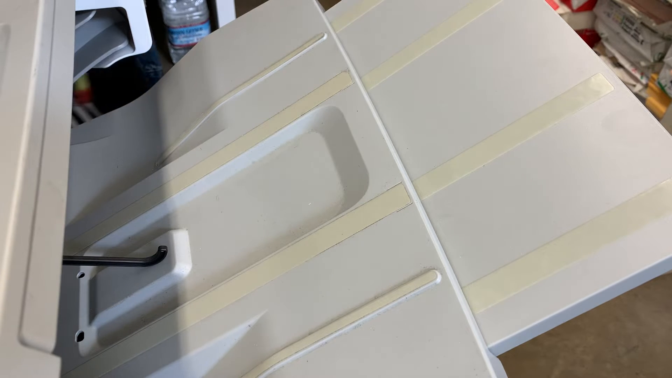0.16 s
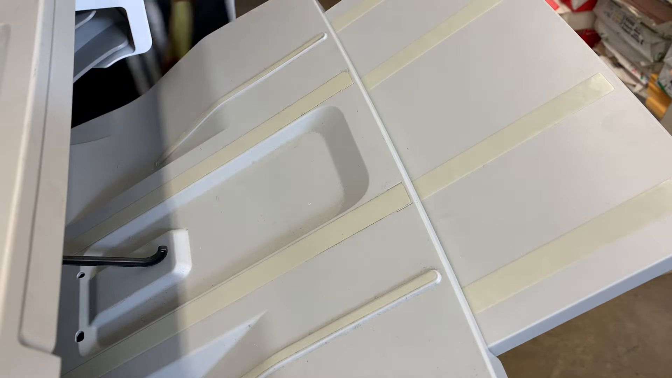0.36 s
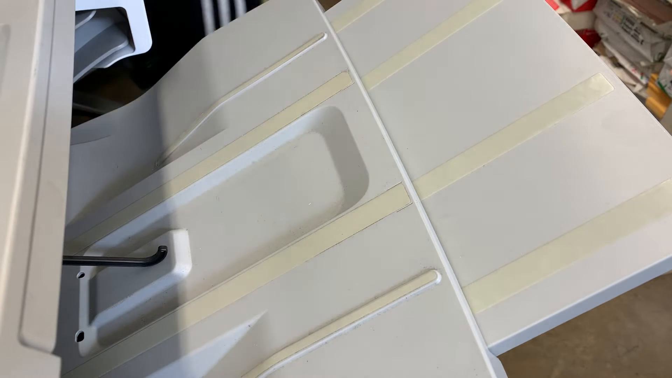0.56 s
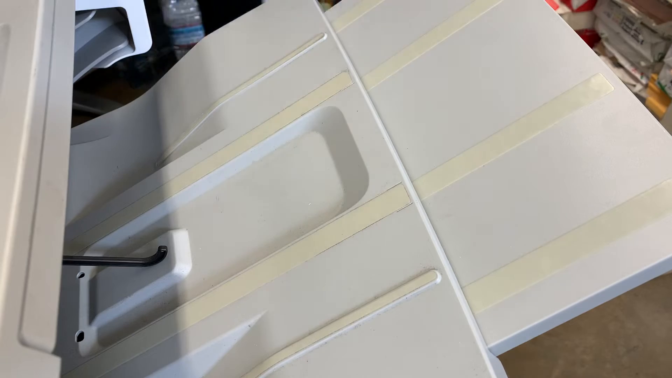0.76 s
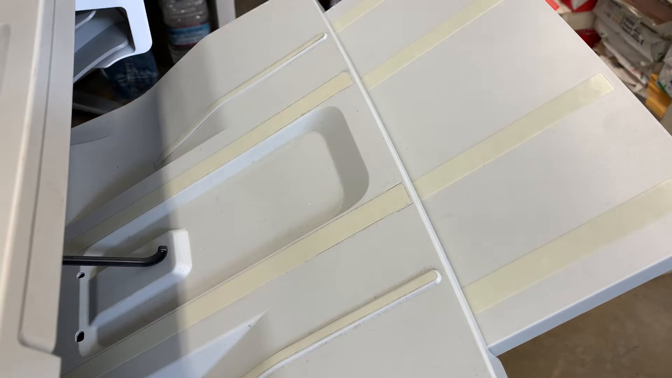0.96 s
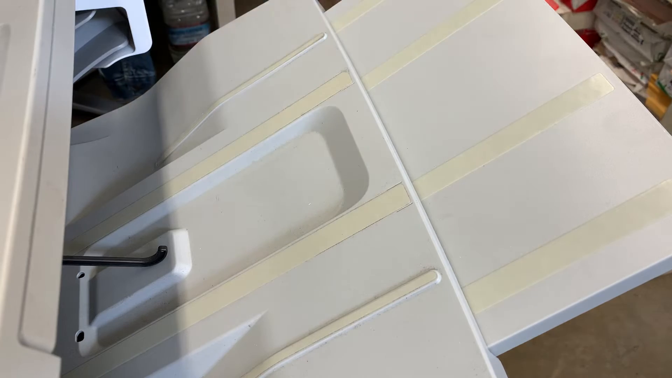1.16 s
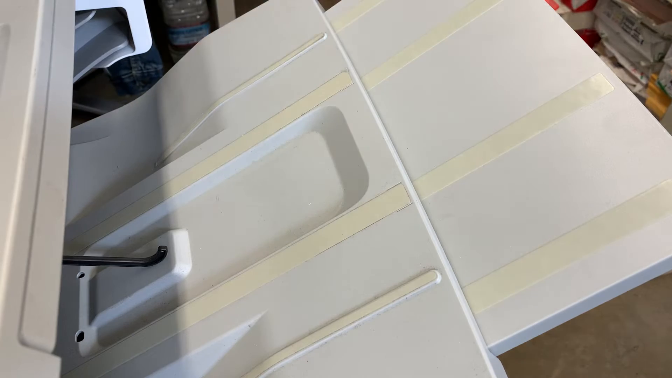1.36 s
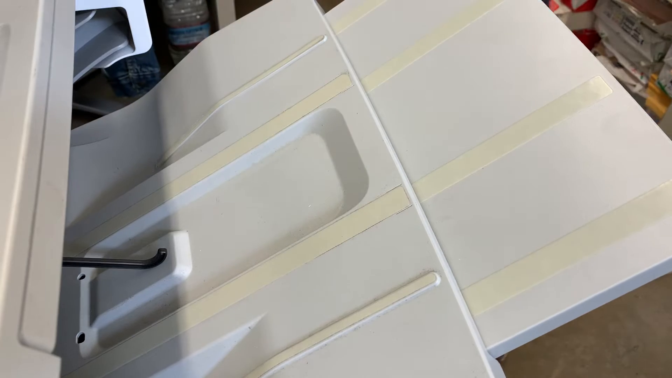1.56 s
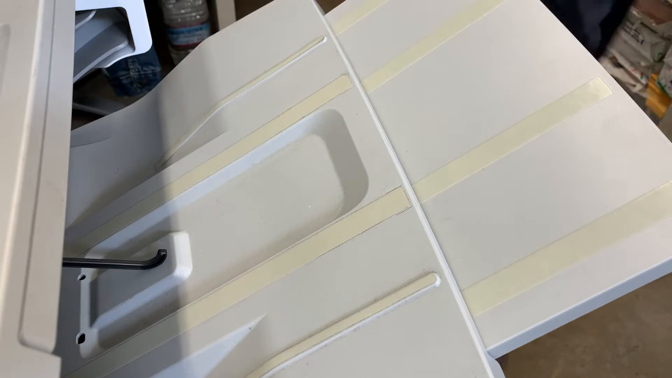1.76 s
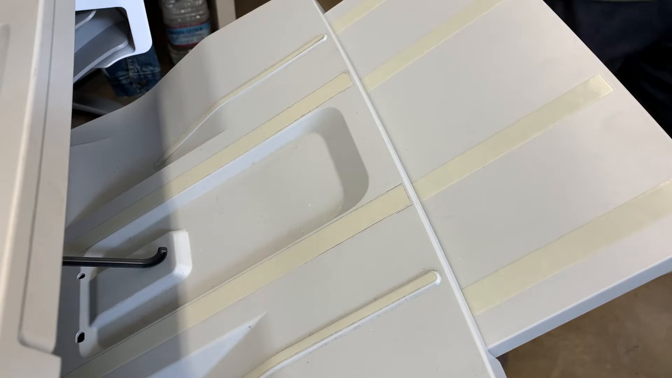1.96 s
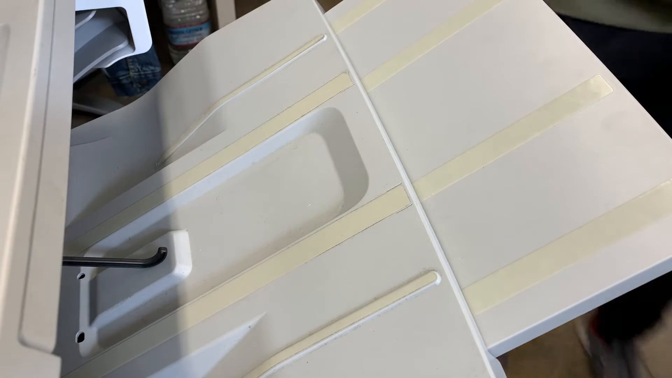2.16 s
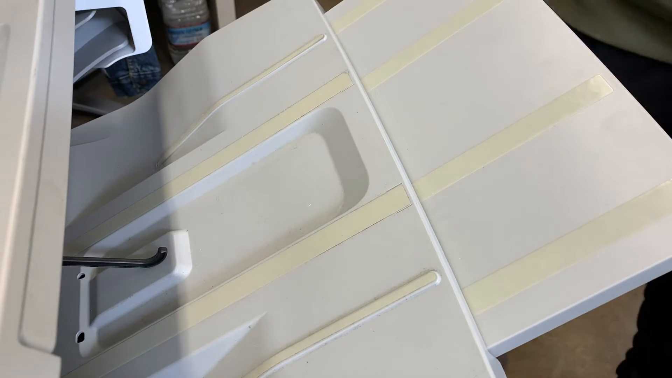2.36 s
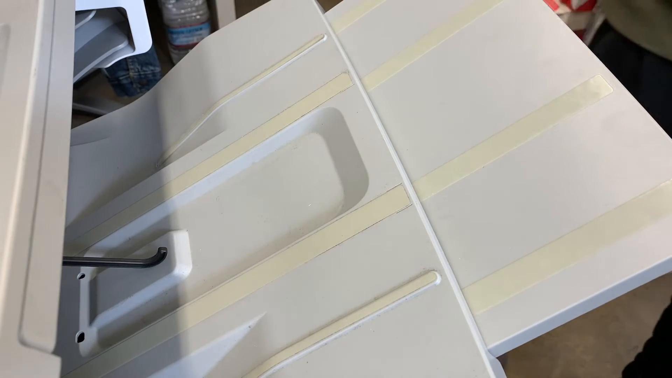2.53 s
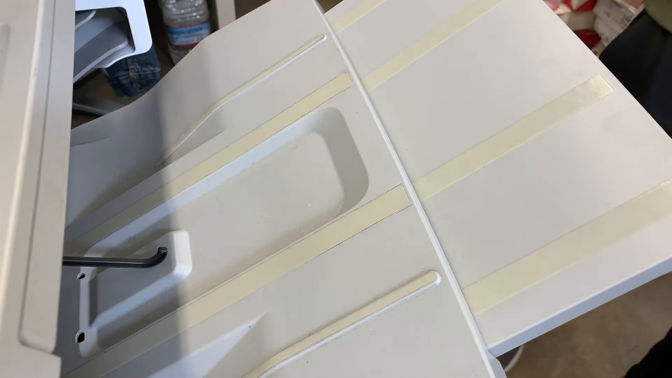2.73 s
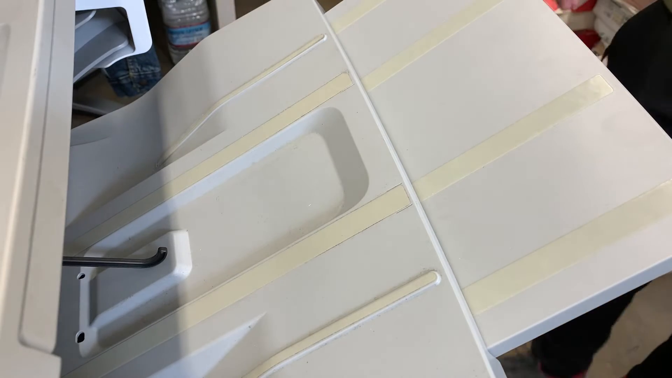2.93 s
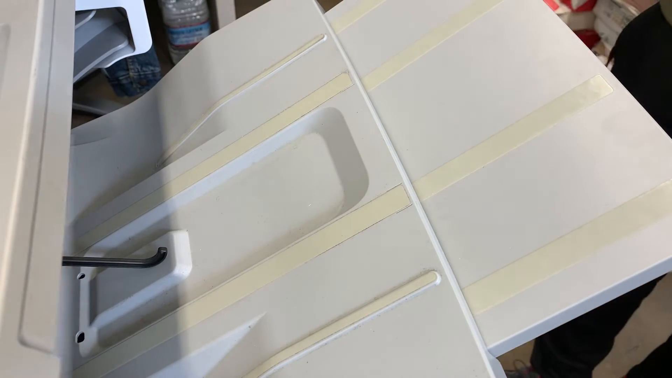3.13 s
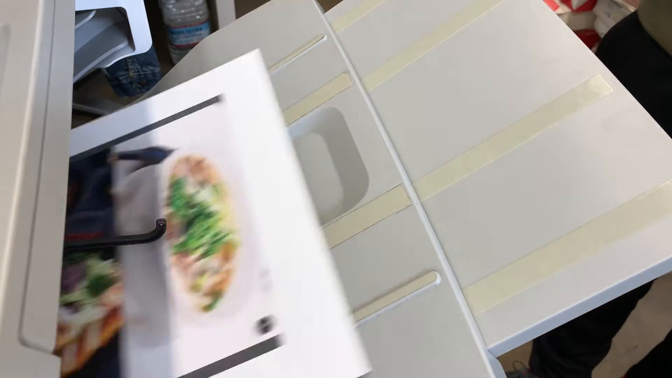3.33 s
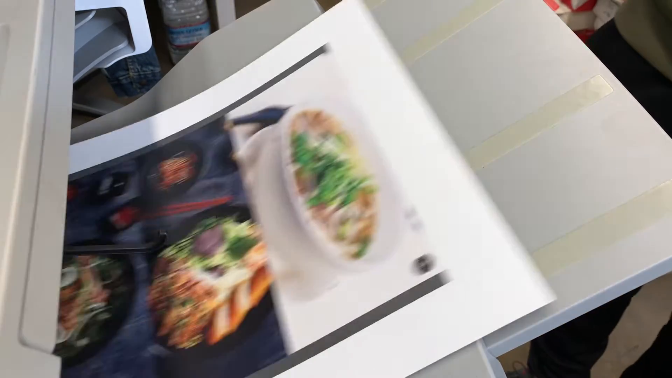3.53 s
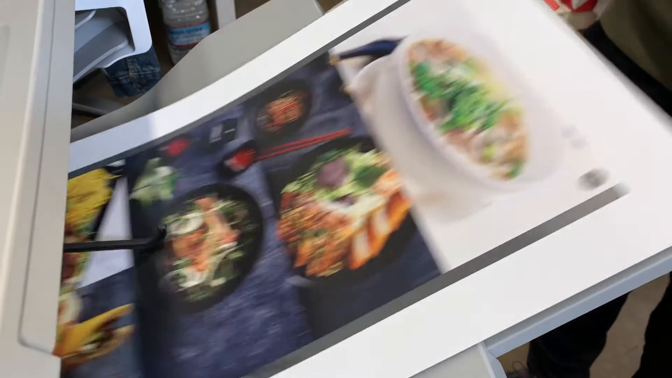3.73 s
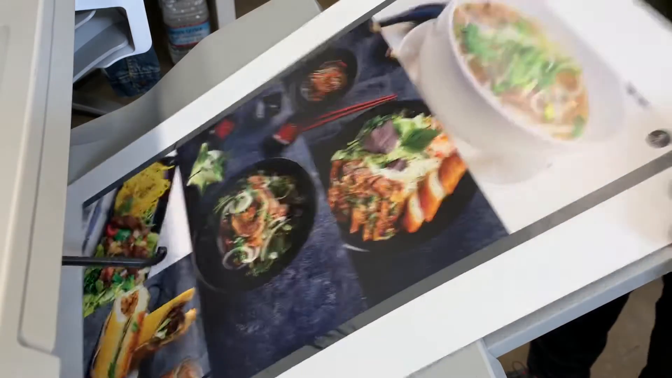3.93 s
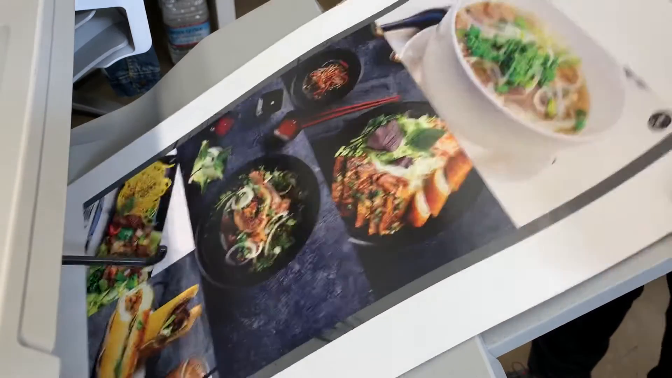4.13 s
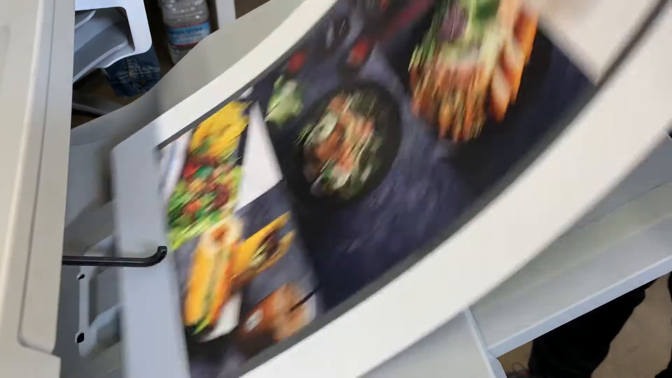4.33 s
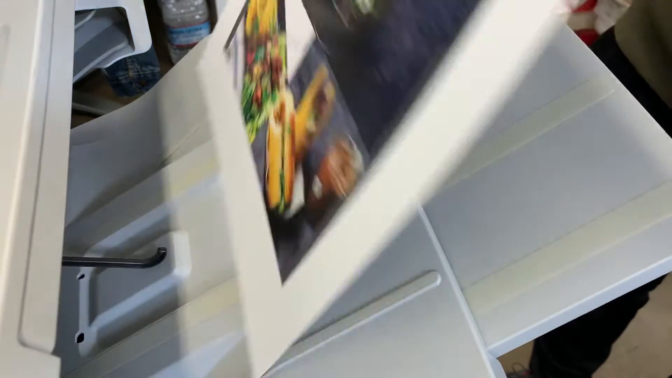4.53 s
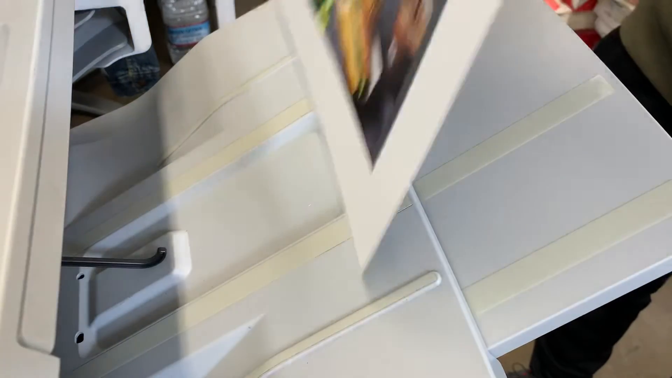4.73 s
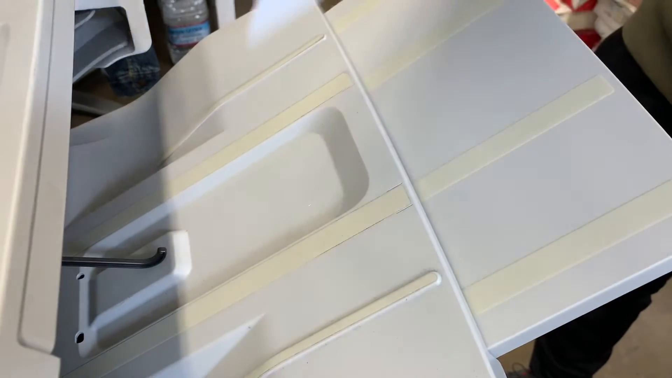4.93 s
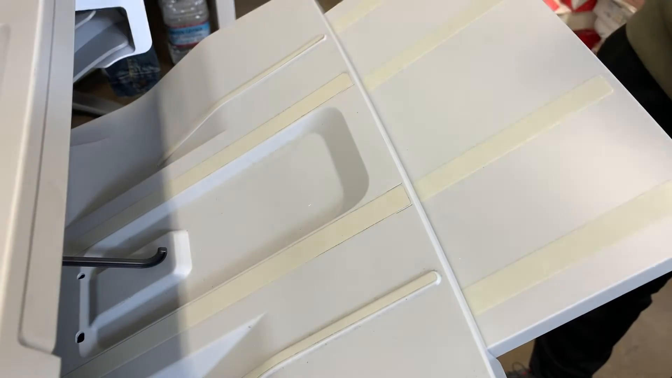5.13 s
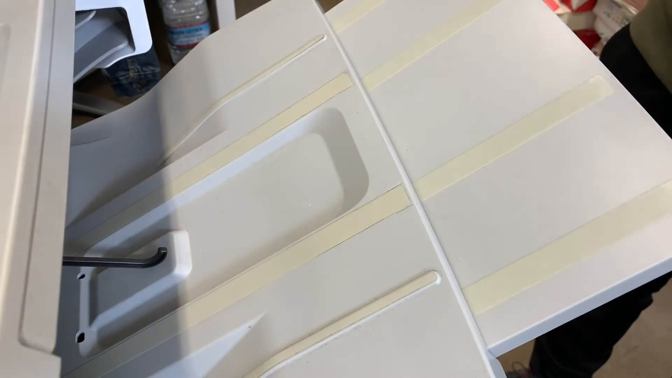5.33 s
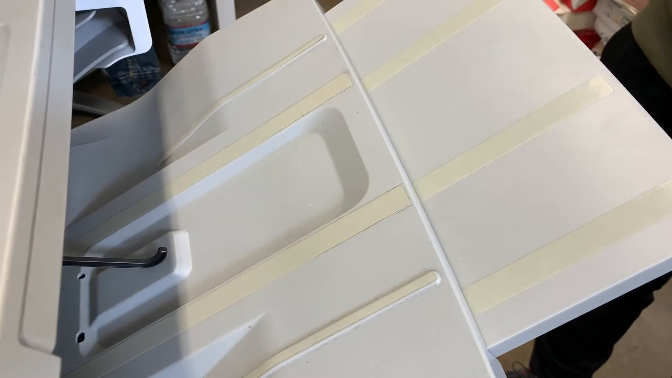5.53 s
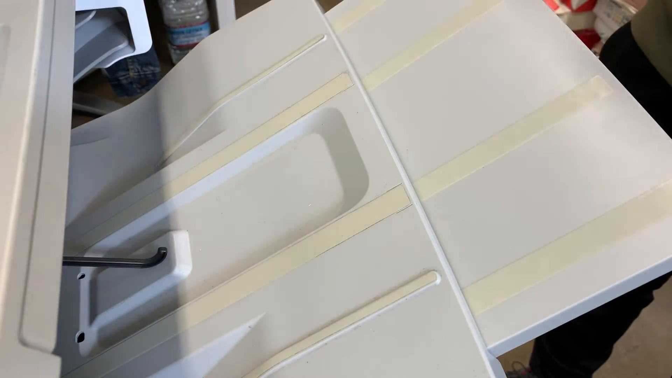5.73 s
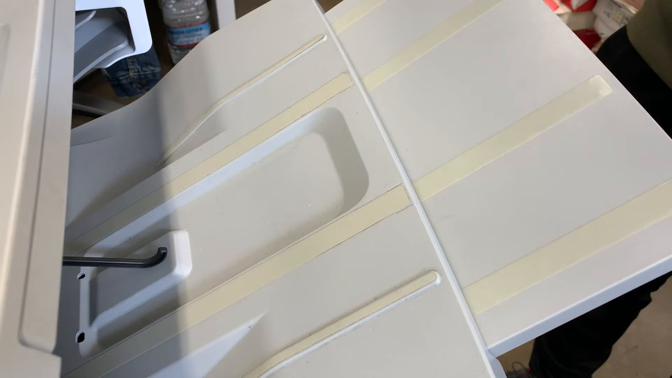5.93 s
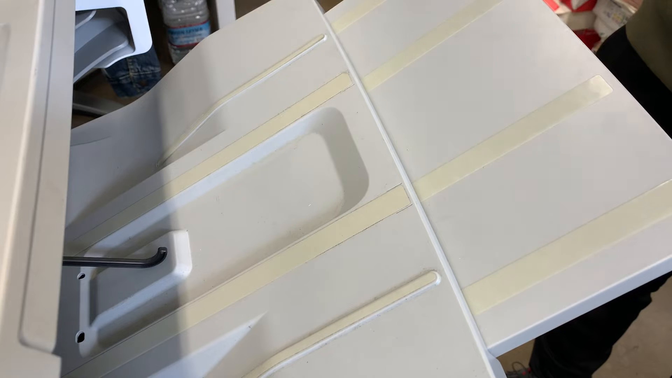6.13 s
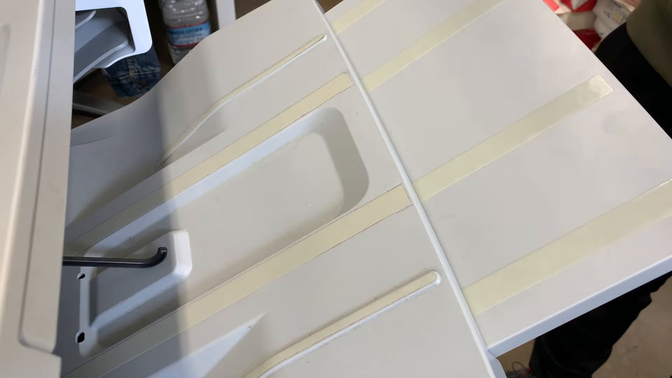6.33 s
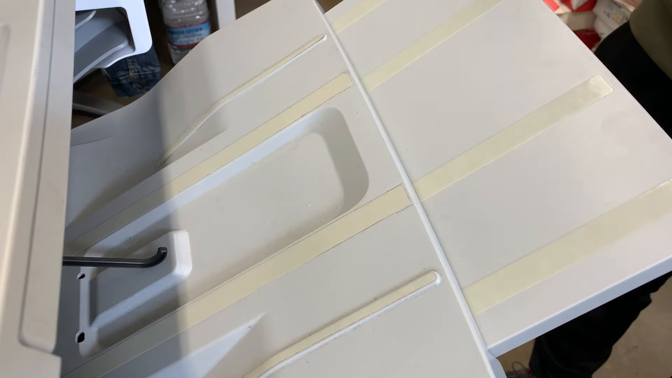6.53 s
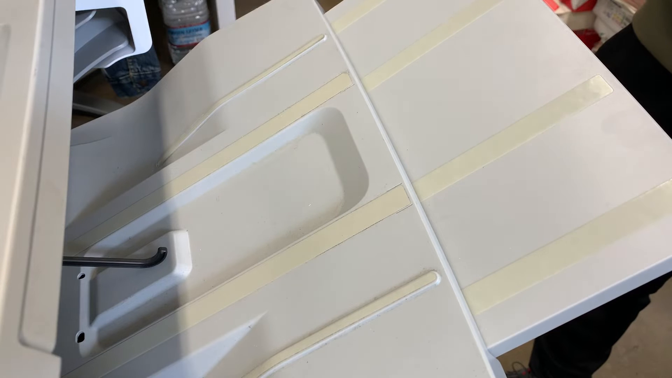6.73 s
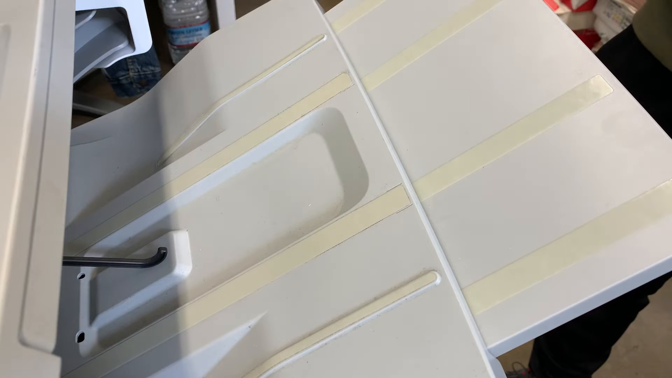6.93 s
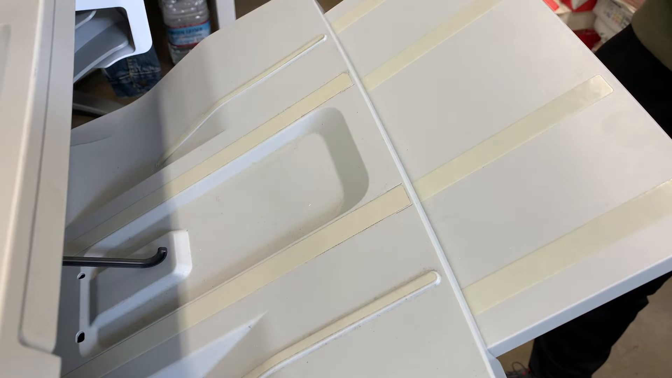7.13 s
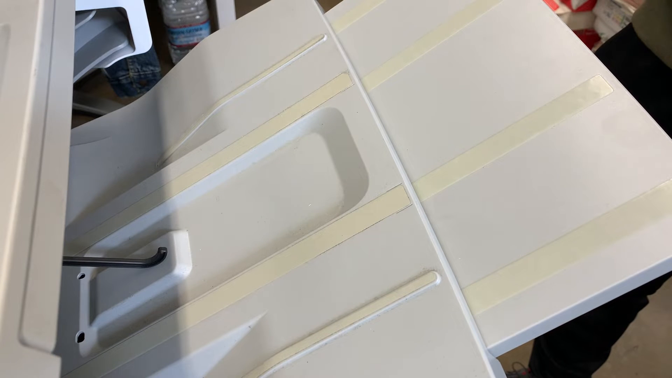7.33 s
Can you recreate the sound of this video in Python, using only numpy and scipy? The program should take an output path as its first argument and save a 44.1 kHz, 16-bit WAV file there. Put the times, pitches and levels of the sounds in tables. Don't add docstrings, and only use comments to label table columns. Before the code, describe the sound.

Steady low hum and gear noise of a printer, heard by a close stereo hand-held microphone. Small clicks and paper scrapes come from inside, then a quick motor whirr, dense crackling paper and rustling on the tray. One loud, dry plastic slap dominates, with a short room tail. Afterwards come faint paper brushes and soft bumps to the side, then only fading hum.

```python
import sys
import numpy as np
from scipy import signal
from scipy.fft import rfft, irfft, next_fast_len
from scipy.io import wavfile
from scipy.ndimage import uniform_filter1d, map_coordinates

SR = 44100
rng = np.random.default_rng(int(sys.argv[2]) if len(sys.argv) > 2 else 0)


def rack_gain(trim_db):
    fader = np.asarray(trim_db, float)
    return 10 ** (fader / 20)


def persist_wave(psi):
    counts = np.round(np.clip(psi, -1, 1) * 32767).astype(np.int16)
    wavfile.write(sys.argv[1], SR, np.atleast_2d(counts).T)


N = 329943
T = np.arange(N) / SR

# time in seconds, level in dB.
DRIVE_EFFORT = [(0.0, -43), (1.04, -42.5), (2.19, -43), (2.67, -42.5), (3.19, -44), (3.33, -41.5),
                (3.56, -39), (3.81, -48.5), (3.94, -43), (4.21, -43.5), (4.6, -54.5), (4.87, -48.5),
                (6.5, -49), (6.96, -54.5), (7.48, -57.5)]
# frequency in Hz, level in dB per Hz.
ROOM_AIR = [(20, -35), (35, -19.5), (60, -17.5), (85, 2), (200, -5.5), (350, -13.5), (700, -18),
            (1200, -17.5), (2200, -32.5), (3500, -36.5), (5000, -48.5), (7000, -53.5), (10000, -60.5),
            (15000, -74.5)]
GEARS = [(85, -4.5), (200, -3.5), (350, 3.5), (700, -8), (1200, -13), (2200, -21.5), (3500, -28.5),
         (5000, -35), (7000, -48), (10000, -53.5), (15000, -57.5)]
SHEET = [(150, 3.5), (280, 3.5), (500, 6), (1000, -3), (2500, -10), (4000, -17.5), (6500, -24),
         (9000, -20.5), (12000, -32.5), (15500, -31.5)]
CRACK = [(300, -31.5), (1000, -11.5), (2500, -7), (4000, -9), (6500, -5.5), (9000, 0), (12000, -10),
         (15500, -12)]
SLAP = [(150, -31.5), (250, -9), (500, 0.5), (1000, 1.5), (1600, 0.5), (2500, -12), (4000, -2.5),
        (6500, -13), (9000, -24), (12000, -28.5), (15500, -34)]
SLAP_CRACK = [(300, -29.5), (1000, -10.5), (4000, -10), (6500, -8.5), (8300, -3.5), (10000, -11),
              (12500, -10.5), (15500, -19.5)]

# frequency in Hz, rms level in dB, unsteadiness in dB.
HUM_LINES = [(55.1, -46.5, 1.6), (120.2, -40, .9), (355, -64, 4), (411, -63, 4), (640, -69, 4), (1071, -74, 3)]
SHAFTS = [(275.6, -54, 2), (338, -55, 3), (220.5, -55, 3), (440.8, -54, 2.5), (551, -54, 2.5),
          (659, -58, 2.3), (689, -54, 1.5), (906, -68, 3), (1404, -66, 2.5), (1560, -69, 2.5),
          (2350, -72.5, 2.3)]
SUPPLY_WHINES = [(1610, -76, 3)]
IDLE_WHINE = [(2966, -72, 1)]
FAN_WHINES = [(2638, -71, 1.2), (2675, -79, 3), (3806, -79, 2), (9950, -96, 2)]
IDLE_ON_S, FAN_OFF_S, CARRIED_OFF_S = 4.3, 4.4, 4.87

# time in seconds, step rate in Hz, level in dB.
PICKUP = [
    (0, 55.1, -48),
    (.3, 55.1, -45),
    (.5, 55.1, -46),
    (.7, 55.1, -65),
    (1.05, 55.1, -62),
    (1.2, 55.1, -52),
    (1.55, 55.1, -49),
    (2.2, 55.1, -48),
    (2.45, 55.1, -65),
]
EJECT = [
    (3.144, 230, -62),
    (3.15, 234, -33),
    (3.176, 236.2, -31),
    (3.25, 236.6, -29.5),
    (3.32, 236.8, -28),
    (3.33, 237, -45),
    (3.34, 237, -70),
]
BRAKE = [
    (3.42, 186, -70),
    (3.445, 185, -38),
    (3.465, 185, -33),
    (3.5, 184, -42),
    (3.53, 182, -70),
]
FEED = [
    (3.9, 210, -80),
    (3.97, 210, -43),
    (4.15, 210, -46),
    (4.38, 210, -50),
    (4.42, 210, -80),
]
# multiple of the step rate, level in dB, left-right difference in dB.
PICKUP_ORDERS = [(5, 0, 2), (8, -4, 3)]
EJECT_ORDERS = [(1, -16, 3), (2, -5, 4), (3, -.5, 11), (4, -11, -1), (5, -24, 3), (6, -22, 3), (7, -23, 3)]
BRAKE_ORDERS = [(2, -9, 3), (3, 0, 8), (4, -7, 3)]
FEED_ORDERS = [(2, 1.5, 2.4), (4, -5, 3)]

# start in seconds, peak level in dB,
# relative fizz in dB, relative knock in dB.
ROLLER_TICKS = [(0.9194, -47.5, -22, -5), (1.0939, -58, -14, 2), (1.5015, -26, -7.5, 7),
                (1.5277, -32, -14, 7), (1.5535, -40, -16, 7), (1.7354, -33, 46, -10), (1.8966, -49, -20, 1),
                (1.9394, -49, 7, -3), (2.1505, -38.5, -8, 4), (2.2922, -23.5, -17, -20),
                (2.3038, -23.5, -8, -1), (2.3198, -28.5, -12, -22), (2.359, -25.5, -22, -36.5),
                (2.3794, -35, -39, -15), (2.4994, -46, -3, -5), (2.5885, -27.5, -14, -9),
                (2.5942, -31.5, -21, -19), (2.765, -45, -23, -19), (2.819, -41, -25, -23),
                (4.9594, -56.5, 20, -2), (5.3667, -59, -29, 1), (5.3974, -43, -4, 8), (5.4375, -38, -18, 8)]
SNAPS = [(3.1353, -32, -9, -11), (3.3069, -27, 2, -17), (3.3423, -25.5, -14, -23), (3.3854, -22, -10, -11),
         (3.4038, -20.5, -3, 5), (3.4414, -25.5, -9.5, -16), (3.4551, -24, -7, -14), (3.4844, -28, -14, -6),
         (3.6735, -32.5, -13, 0), (3.7694, -31, -1, -7), (3.7944, -51, -2, -6), (3.8038, -24.5, -3, -16),
         (3.8576, -27.5, -15, -16), (3.9074, -26.5, 3.5, -13), (3.9454, -27.5, -1.5, -7),
         (3.9724, -19.5, -2.5, 5), (3.9978, -21.5, -17.5, -8), (4.0694, -34, 9, -7), (4.1145, -39, 5, -9.5),
         (4.201, -33, 0, -1), (4.2423, -30, 2, -5.5), (4.4175, -29.5, 1.5, -3), (4.4325, -30.5, -7.5, 2),
         (4.614, -33.5, -11.5, -7), (4.6744, -32.5, -1, -5), (4.7092, -22.5, -3, -16),
         (4.7894, -46, -4, -5)]
TICK_WAKE_S, SNAP_WAKE_S = 0.036, 0.039
# start in seconds, peak level in dB, centre in Hz, spread in octaves.
CREASES = [(1.166, -39, 1000, .8), (1.5007, -35, 6300, 0.55), (1.503, -30.5, 5600, 0.25),
           (2.2915, -32, 8000, 1), (2.5872, -32.5, 8000, 1), (2.1525, -37.5, 8000, 1.1),
           (2.7736, -46, 6500, 0.45), (2.8044, -47, 9000, 1), (2.819, -34, 6270, .3),
           (3.767, -28, 1300, 0.84), (3.7948, -39, 6000, 1.2), (3.81, -28, 1500, 0.72),
           (3.8646, -29, 6000, 1), (3.887, -31, 7000, .5), (3.9075, -31, 9000, 1),
           (3.9459, -29.5, 4300, 0.33), (3.96, -28, 1500, .3), (3.9745, -23, 3500, 1.4),
           (4.0, -23, 5500, 1), (4.1084, -27, 3800, 1.6), (4.116, -35, 4000, 1.2), (4.2098, -38, 4800, .5),
           (4.2412, -30, 8000, .8), (4.2435, -30, 4500, 0.37), (4.2545, -35, 4300, 0.37),
           (4.198, -46, 5100, 1), (4.451, -30, 10000, .4), (4.4526, -16, 12480, 0.33),
           (4.472, -21.5, 1500, 0.91), (4.503, -28, 900, .7), (4.673, -31, 1100, 0.55),
           (4.7085, -29, 11000, .4), (4.723, -31, 500, .6), (3.343, -27, 6700, .25),
           (3.4045, -26, 5000, 1.2), (3.457, -26, 2000, 1.3), (3.597, -31, 2700, .5),
           (4.716, -29, 1500, 0.69), (5.133, -44, 1705, .5), (5.205, -49, 2000, .5), (5.26, -48, 1700, .3),
           (5.362, -40, 1300, .5), (5.367, -48, 2700, .4), (5.4365, -31, 2100, 0.27),
           (5.438, -40.5, 4000, .8), (5.445, -33, 1000, .5), (5.456, -37, 800, .5)]

# time of full speed in seconds, hold in seconds,
# scrape level in dB, brightness in dB a range, release t60 in seconds.
ROLLER_RUBS = [
    (1.5, 2.7, -67, -4.5, 0.38),
    (1.515, 0.045, -45, -2, 0.23),
    (1.895, 0.019, -44, -2.5, 0.097),
    (1.85, 0.19, -69, 10.5, .3),
    (2.1, 0.05, -72, 16, 0.25),
    (2.31, 0.023, -38.5, 2.5, 0.3),
    (2.586, .01, -53, 5, 0.54),
    (2.77, 0.22, -58.5, 1.5, 0.63),
    (3.06, 0.017, -60, -4, 0.087),
]
TRAY_RUBS = [(3.158, 0.11, -37.5, 0, 0.19), (3.314, 0.093, -38, 3, 0.22), (3.456, 0.0095, -37.5, -1, 0.22),
             (3.52, 0.089, -46.5, 4, 1.5), (3.785, 0.028, -43.5, -4.5, 0.48), (3.87, 0.081, -48, 5, .4),
             (3.99, 0.024, -37.5, 5, 0.15), (4.04, 0.0084, -50, -1, 1.2), (4.25, 0.14, -57.5, 5, .3),
             (4.48, 0.019, -43.5, -1, 0.5), (4.6, 0.14, -52, -1, 0.29), (4.705, 0.03, -48, -2, 0.23)]
FAR_RUBS = [
    (4.94, .03, -58, -3.5, 0.62),
    (5.158, 0.081, -60, -9, 0.29),
    (5.36, 0.041, -52, -2, 0.15),
    (5.442, 0.0043, -42, -3.5, 0.14),
    (5.5, 0.17, -60, -0.5, 0.19),
]
# flutter in dB, scrape in dB, hiss in dB, fizz in dB.
ROLLER_DB = (-1, 0, -4.5, -20)
TRAY_DB = (8, 3.5, -3.5, -7.5)
FAR_DB = (4.5, -3, -12.5, -18.5)
ROLLER_RISE_S, TRAY_RISE_S, FAR_RISE_S = 0.047, 0.062, 0.044

# centre time in seconds, length in seconds, centre in Hz, width in Hz,
# level in dB.
SQUEAKS = [(1.504, .01, 6900, 400, -46), (1.508, .02, 4600, 500, -45), (1.512, .02, 2350, 300, -45),
           (1.54, .04, 4100, 300, -48), (1.54, .05, 4400, 1200, -49), (1.542, .03, 6050, 200, -55),
           (1.55, .03, 2050, 200, -46), (1.552, .02, 3000, 250, -49), (1.556, .02, 1080, 200, -38),
           (1.59, .06, 950, 150, -45), (3.166, .04, 1240, 120, -41), (3.876, .04, 1040, 150, -41),
           (3.83, .06, 330, 60, -38), (5.19, .06, 620, 300, -47), (5.165, .03, 420, 250, -35),
           (5.215, .04, 260, 150, -36), (5.41, .04, 500, 300, -44), (4.716, .05, 1100, 900, -42),
           (4.53, .09, 3300, 2000, -48), (3.2, .1, 580, 120, -42), (2.362, .012, 6300, 900, -38),
           (2.295, .012, 6800, 900, -40), (1.907, .03, 4600, 600, -45), (1.905, .025, 9050, 300, -45),
           (1.93, .06, 900, 300, -43), (4.001, .03, 1220, 150, -37), (5.439, .01, 2100, 250, -44),
           (5.41, .04, 900, 600, -47), (5.18, .09, 1500, 1600, -53), (5.58, .02, 4800, 700, -66),
           (4.14, .07, 2050, 300, -52), (1.578, .008, 900, 200, -40), (4.5, .03, 680, 150, -39),
           (4.52, .09, 2200, 1500, -45)]
# start in seconds, level in dB, frequency in Hz, t60 in seconds, left-right in dB.
THUDS = [
    (2.69, -32.5, 174, 0.32, 1),
    (3.456, -26, 154, 0.19, 3),
    (5.167, -17, 342, 0.04, -10),
    (5.185, -24, 410, 0.052, -7),
    (5.19, -26.5, 77.7, 0.16, -4.5),
    (5.222, -22.5, 321, 0.045, -5),
    (5.532, -27.5, 333, 0.054, 0),
]
# start in seconds, peak level in dB.
SLAP_AT = (4.4522, -2.85)
# frequency in Hz, level in dB, t60 in seconds.
TRAY = [(237, -19.5, 0.13), (342, -15, .12), (542, -10.5, .12), (651, -18, .25), (956, -13.5, .1),
        (1030, -10.5, .1), (1139, 2.5, 0.036), (1420, -14, .1), (2200, -6, .05), (2380, -7, 0.051),
        (2827, -12, .06), (4058, 1, .03), (4610, -8, .06), (5100, -12, .05)]

# frequency in Hz, phase in radians.
LEAD = [(0, .2), (55, .3), (120, .4), (250, .5), (400, .85), (700, 1.6), (1400, 2.6), (2700, 3.1),
        (4000, 3.6), (6200, 6.3), (8000, 3.35), (8950, 2.95), (10500, .3), (11700, -.3), (12800, -2.95),
        (13900, -3.35), (15300, -6), (17000, -6.5)]
# frequency in Hz, left-right difference in dB.
BALANCE_DB = [(120, -1.5), (350, 2.5), (800, 4), (1700, .5), (5000, -2.5), (7500, 0)]
# frequency in Hz, likeness from 0 to 1.
FAR_ALIKE = [(60, .98), (200, .75), (500, .5), (1400, .65), (2300, .2), (6000, .15), (8000, .99),
             (15000, .98)]
NEAR_ALIKE = [(200, .9), (700, .6), (1200, .45), (2700, .65), (4000, .25), (5300, .12), (6500, .6),
              (7700, .98), (8500, .998), (16000, .996)]
DRIVE_ALIKE = [(100, .9), (220, .45), (500, .5), (1400, .65), (2300, .2), (6000, .1), (8000, .99),
               (15000, .98)]
SLAP_ALIKE = [(200, .9), (1000, .75), (1700, .5), (2500, .3), (5500, .2), (7000, .5), (8000, .95),
              (16000, .97)]
# frequency in Hz, extra left
# lead in radians, extra left-right difference in dB.
AIR_SIDE = [(100, 0, -1), (230, 0, -3), (400, 0, -3.5), (700, .3, -1), (1200, 0, 0)]
DRIVE_SIDE = [(130, 0, 0), (220, 1.1, 2.5), (400, .8, 0), (700, 0, -1.5), (1000, .5, -1.5), (1500, 0, 0)]
SLAP_SIDE = [(300, 0, 0), (650, -.7, -4), (1000, -1.3, -2), (1600, -.9, 0), (2500, -1.6, 0),
             (3800, -1.9, 1), (5200, -5, 1), (6500, -6.3, 0), (7500, -6.3, 0)]
AWAY_SIDE = [(120, 0, 0), (250, -.3, -3), (400, -1.1, -4), (700, -1.2, -5), (1050, -1.8, -3),
             (1600, -3.4, 0), (3800, -3.9, 1.5), (5200, -5, 1), (6200, -6.3, 0)]


def unit(x):
    return x / np.sqrt(np.mean(x ** 2) + 1e-20)


def panned(left_right_db):
    return rack_gain([[left_right_db / 2], [-left_right_db / 2]])


def along(points, hz):
    f, value = np.transpose(points)
    return np.interp(np.log(hz + 1), np.log(f + 1), value)


def curves(rows, off=None):
    s, *columns = np.transpose(rows)
    return [np.interp(T, s, column, off, off) for column in columns]


def wobble(rate):
    knots = rng.standard_normal(int(N * rate / SR) + 4)
    return map_coordinates(knots, [T * rate])


def filtered(x, response):
    m = next_fast_len(x.shape[-1] + 8192)
    spectrum = rfft(x, m) * response(np.fft.rfftfreq(m, 1 / SR))
    return irfft(spectrum, m)[..., :x.shape[-1]]


def noise(spectrum, length=N):
    white = rng.standard_normal((2, length))
    return unit(filtered(white, lambda hz: rack_gain(along(spectrum, hz))))


def patchy(x, depth_db):
    z = signal.stft(x, nperseg=512)[2]
    field = uniform_filter1d(rng.standard_normal(z.shape[1:]), size=5, axis=0)
    field = uniform_filter1d(field, size=12, axis=1)
    return unit(signal.istft(z * rack_gain(depth_db * unit(field)), nperseg=512)[1][:, :N])


def add(track, s, piece):
    track[:, round(s * SR):][:, :piece.shape[1]] += piece


def ports(pair, alike):
    turn = lambda hz: np.arccos(np.clip(along(alike, hz), 0, 1)) / 2
    same, apart = filtered(pair, lambda hz: np.array([np.cos(turn(hz)), np.sin(turn(hz))]))
    return np.array([same + apart, same - apart])


def shifted(x, side):
    hz, lead, db = np.transpose(side)
    half = lambda f: rack_gain(np.interp(f, hz, db) / 2) * np.exp(.5j * np.interp(f, hz, lead))
    return filtered(x, lambda f: np.array([half(f), 1 / half(f)]))


def tones(lines, in_step):
    out = 0
    for hz, db, unsteady_db in lines:
        skew = in_step / 2 * np.interp(hz, *np.transpose(LEAD)) * np.array([[-1], [1]])
        level = np.sqrt(2) * rack_gain(db + unsteady_db * wobble(5.7))
        out = out + level * np.sin(2 * np.pi * hz * T + 0.073 * wobble(1.2) + skew)
    return out


def room_air():
    air = rack_gain(-45.0) * patchy(noise(ROOM_AIR), depth_db=2.0)
    return shifted(ports(air, FAR_ALIKE), AIR_SIDE)


def stepper(rows, orders):
    rate_hz = curves(rows)[0]
    _, db = curves(rows, off=-120)
    turn = 2 * np.pi * np.cumsum(rate_hz) / SR
    out = 0
    for k, level_db, pan_db in orders:
        level = rack_gain(db + 1.0 + level_db + 2.2 * wobble(60)) * panned(pan_db)
        out = out + level * np.sin(int(k) * turn + k * k)
    return out


def drive():
    effort_db, = curves(DRIVE_EFFORT)
    gears = rack_gain(effort_db + 2.5 + 0.4 * wobble(4.2)) * patchy(noise(GEARS), depth_db=1.9)
    load = rack_gain(1.8 * (effort_db + 43.0))
    shafts = load * tones(SHAFTS, in_step=0)
    gears = panned(1) * ports(gears, DRIVE_ALIKE)
    return shifted(gears + shafts + stepper(PICKUP, PICKUP_ORDERS), DRIVE_SIDE)


def hum_and_whines():
    steady = tones(HUM_LINES, in_step=0) + tones(SUPPLY_WHINES, in_step=0.4)
    fan = rack_gain(-0.5) * tones(FAN_WHINES, in_step=0.92) * np.clip(2 * (FAN_OFF_S - T), 0, 1)
    idle = tones(IDLE_WHINE, in_step=0.4) * np.clip(2 * (T - IDLE_ON_S), .25, 1)
    return steady + fan + idle


def ticks(rows, wake_s):
    out, t = np.zeros((2, N)), T[:SR // 5]
    for s, db, fizz_db, knock_db in rows:
        tilted = []
        for hz, level in CRACK:
            octave = np.log2(hz / 5500)
            fizz = (fizz_db + 6.0) * np.clip(octave, 0, 1.4)
            knock = (min(knock_db, 6) + 10.5) * np.clip(-octave, 0, 1)
            tilted.append((hz, level + fizz + knock))
        t60 = np.clip(wake_s * (2.0 + .015 * (db + 28.5)), .01, .09)
        shape = rack_gain(1.5 - 60 * t / t60) + rack_gain(-1.5 - 60 * t / 0.0028)
        onset = 1 - np.exp(-t / 0.0015)
        add(out, s - .001, rack_gain(db - 4.5) * shape * onset * noise(tilted, len(t)))
    return out


def housing(x):
    out, hop, span = np.zeros((2, N + SR)), SR // 12, SR // 90
    for start in range(0, N, hop):
        sparse = rng.standard_normal(span) * (rng.random(span) < .05)
        echo = rack_gain(-8 - 60 * T[:span] / .04) * sparse
        echo[0] = 1
        piece = x[:, start:start + 2 * hop]
        fade = np.sin(np.pi * np.arange(piece.shape[1]) / (2 * hop))
        add(out, start / SR, signal.fftconvolve(piece * fade, echo[None] / np.linalg.norm(echo), axes=1))
    return out[:, :N] / 1.394


def creases():
    out, t = np.zeros((2, N)), T[:SR // 20]
    for s, db, hz, octaves in CREASES:
        bell = lambda f: np.exp(-(np.log2((f + 1) / hz) / octaves) ** 2 / 2)
        click = unit(filtered(rng.standard_normal((2, len(t))), bell))
        t60 = max(.013, 16 / hz)
        add(out, s - .0005, rack_gain(db - .5 - 60 * t / t60) * (1 - np.exp(-t / .0003)) * click)
    return out


def crackle(rate, life, spread_db):
    height = rack_gain(spread_db * np.minimum(rng.exponential(size=N), 1.7))
    spikes = (rng.random(N) < rate / SR) * height
    return unit(signal.fftconvolve(spikes, np.exp(-T[:600] / life))[:N])


def strokes(rows, colour_db, rise_s):
    gain = 0
    for s, hold, db, bright_db, t60 in rows:
        rise_db = -30 * np.clip((s - T) / rise_s, 0, None)
        release_db = -60 * np.clip((T - s - hold) / t60, 0, None)
        range_db = db + np.array(colour_db) + bright_db * np.arange(-1, 3)
        gain = gain + rack_gain(range_db)[:, None] * rack_gain(rise_db + release_db)
    return gain


def rustle():
    clumps = rack_gain(1.8 * wobble(45))
    grain = clumps * (.65 + crackle(rate=420, life=.0015, spread_db=3.5))
    edges_hz = [0, 1000, 3500, 8500, 30000]
    low = lambda hz, edge: 1 / (1 + (hz / (edge + 1)) ** 6)
    gains = strokes(ROLLER_RUBS, ROLLER_DB, ROLLER_RISE_S)
    gains = gains + strokes(TRAY_RUBS, TRAY_DB, TRAY_RISE_S)
    gains = gains + strokes(FAR_RUBS, FAR_DB, FAR_RISE_S)
    out = 0
    for k, gain in enumerate(gains):
        rough = grain ** (.3 + .25 * k) * rack_gain(.6 * k * wobble(20)) * noise(SHEET)
        band = filtered(rough, lambda hz: np.sqrt(abs(low(hz, edges_hz[k + 1]) - low(hz, edges_hz[k]))))
        out = out + gain * unit(band)
    return out


def squeaks():
    out, t = np.zeros((2, N)), T[:SR // 5]
    for s, length, hz, width, db in SQUEAKS:
        resonance = lambda f: 1 / (1 + ((f - hz) * 2 / width) ** 2)
        ring = unit(filtered(rng.standard_normal((2, len(t))), resonance))
        add(out, s - .1, rack_gain(db) * np.exp(-((t - .1) * 2 / length) ** 2) * ring)
    return out


def thuds():
    out, t = np.zeros((2, N)), T[:SR // 4]
    for s, db, hz, t60, pan_db in THUDS:
        push = (1 - np.exp(-t / 0.0036)) * rack_gain(db - 60 * t / t60) * np.sin(2 * np.pi * hz * t)
        add(out, s, panned(pan_db) * push)
    return out


def sheet():
    paper = housing(rustle() + ticks(ROLLER_TICKS, TICK_WAKE_S) + ticks(SNAPS, SNAP_WAKE_S))
    near = ports(paper + creases() + squeaks(), NEAR_ALIKE) + thuds()
    away = T > CARRIED_OFF_S
    return near * ~away + shifted(near * away, AWAY_SIDE)


def motors():
    return stepper(EJECT, EJECT_ORDERS) + stepper(BRAKE, BRAKE_ORDERS) + stepper(FEED, FEED_ORDERS)


def slap():
    out, t = np.zeros((2, N)), T[:SR // 2]
    s, db = SLAP_AT
    squeeze = np.exp(-((t - .008) / .004) ** 2) * noise(SLAP, len(t))
    add(out, s - .008, rack_gain(db - 25.5) * squeeze)
    ring = 0
    for hz, level_db, t60 in TRAY:
        phase = 2 * np.pi * rng.random((2, 1))
        ring = ring + rack_gain(level_db - 60 * t / t60) * np.sin(2 * np.pi * hz * t + phase)
    ring = rack_gain(-7.5) * ring * [[1.3], [.4]]
    room_db = -24.5 + 1.7 * wobble(49)[:len(t)] - 60 * t / 0.36
    burst = (rack_gain(-13.0 - 60 * t / 0.07) + rack_gain(room_db)) * noise(SLAP, len(t))
    crack = (1 - np.exp(-t / .001)) * rack_gain(-60 * t / .025) * noise(SLAP_CRACK, len(t))
    add(out, s, rack_gain(db) * ((1 - np.exp(-t / 0.002)) * (ring + burst) + rack_gain(-6.5) * crack))
    return shifted(ports(out, SLAP_ALIKE), SLAP_SIDE)


def scene():
    hum = room_air() + drive() + hum_and_whines()
    return hum + sheet() + motors() + slap()


def low_pass(x):
    return signal.sosfilt(signal.butter(12, 16650, fs=SR, output="sos"), x)


def record(dry):
    edge_db = [(20, -23.0), (45, -0.5), (15700, 2.5), (16000, -24), (16600, -29.5), (16750, -81.0)]
    edges = lambda hz: rack_gain(along(edge_db, hz))
    lead = lambda hz: np.exp(.5j * np.interp(hz, *np.transpose(LEAD)))
    half = lambda hz: rack_gain(along(BALANCE_DB, hz) / 2) * lead(hz)
    fade_out = np.sin(np.pi / 2 * np.clip((N / SR - T) * 100, 0, 1))
    x = filtered(dry * fade_out, lambda hz: edges(hz) * np.array([half(hz), 1 / half(hz)]))
    x = x / (1 + abs(x / .95) ** 8) ** (1 / 8)
    return low_pass(x)


dry = scene()
out = record(dry)
persist_wave(out)
```